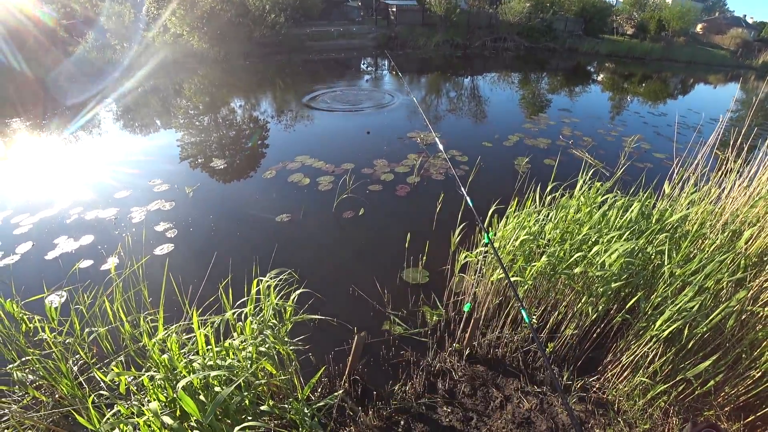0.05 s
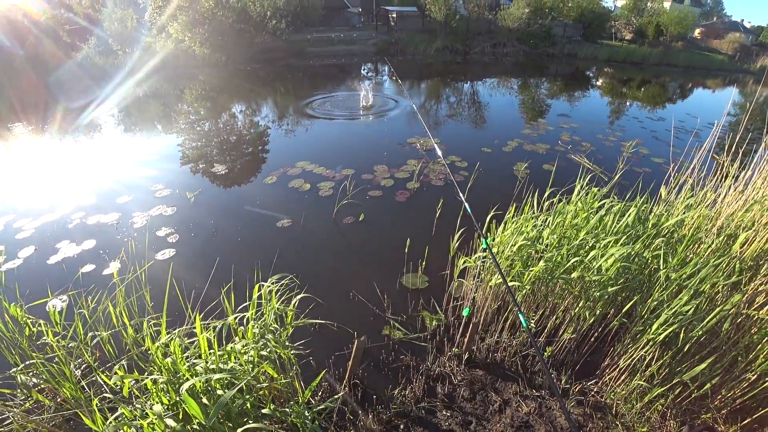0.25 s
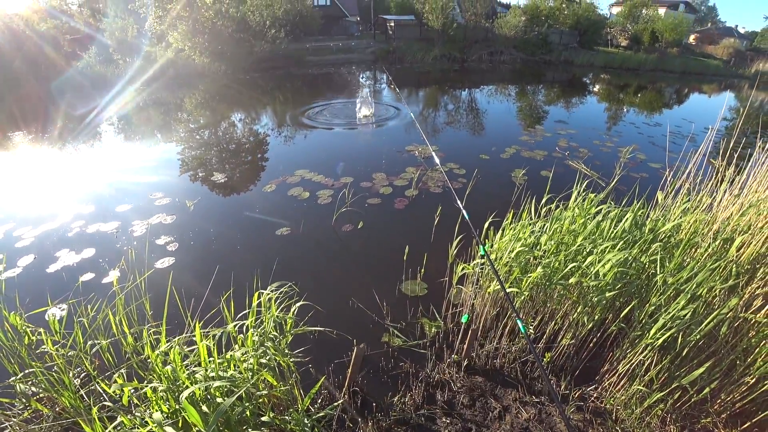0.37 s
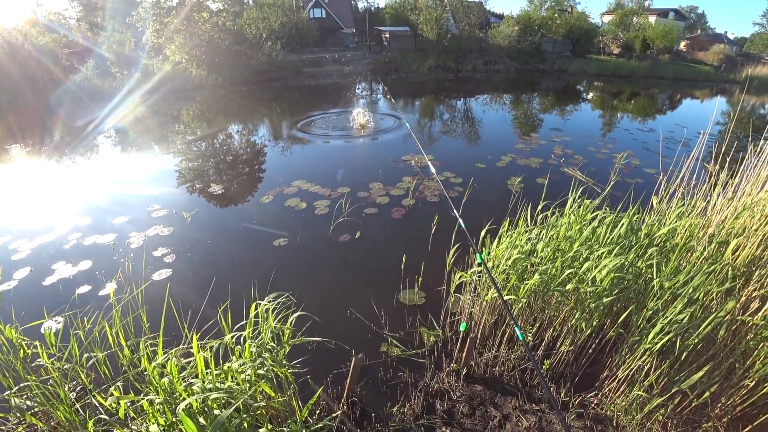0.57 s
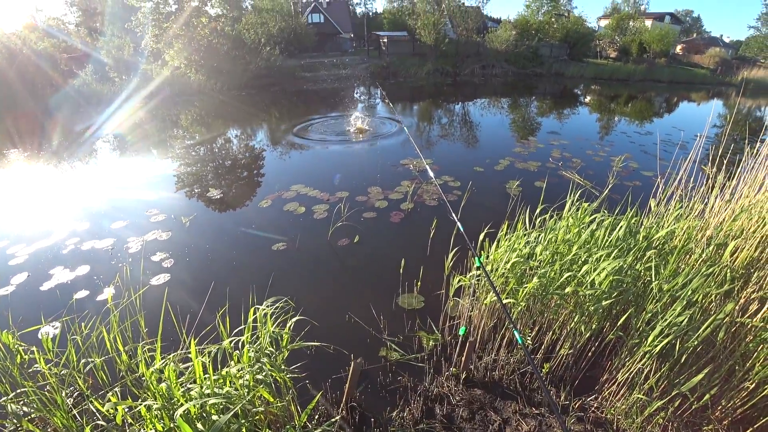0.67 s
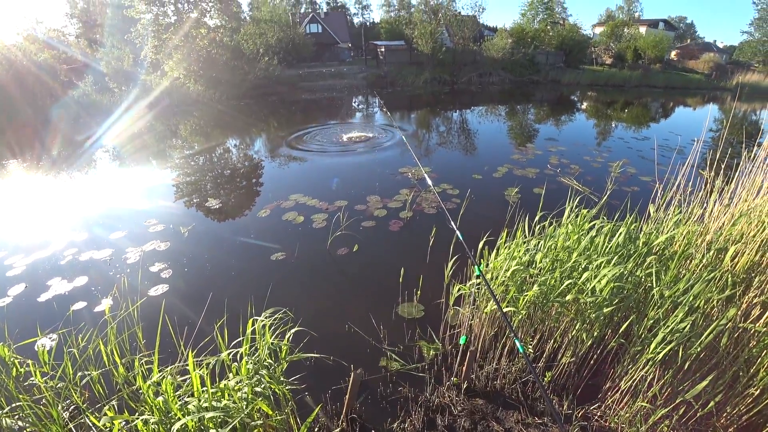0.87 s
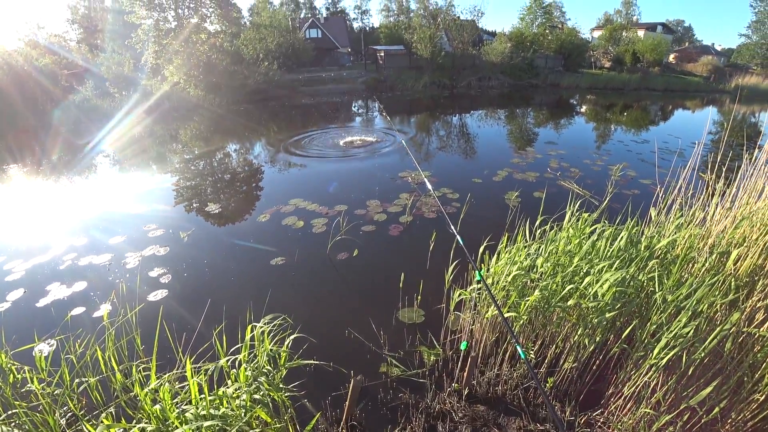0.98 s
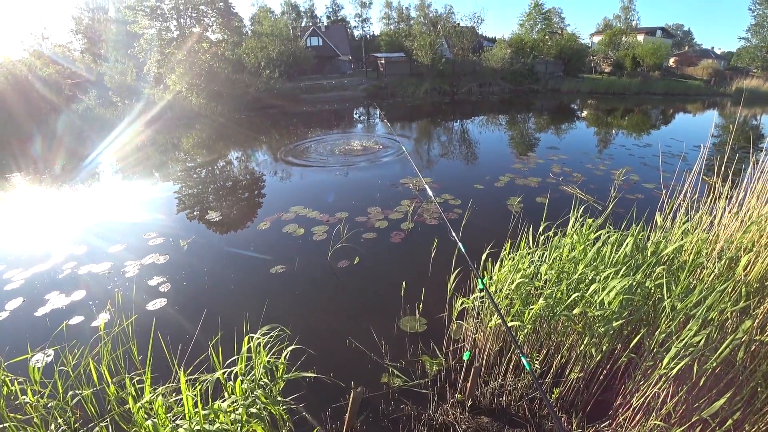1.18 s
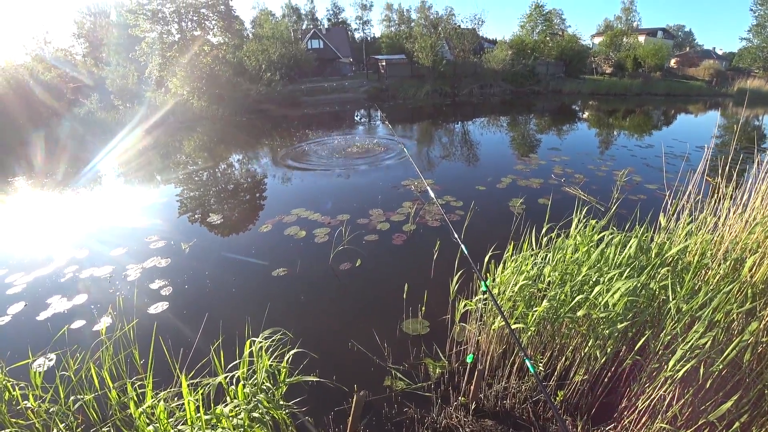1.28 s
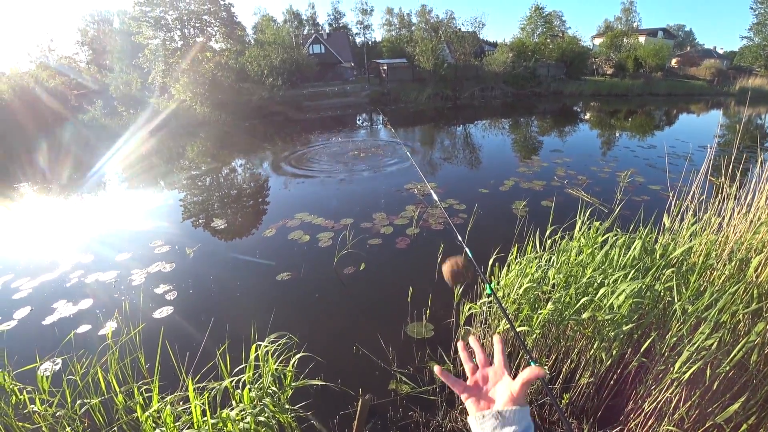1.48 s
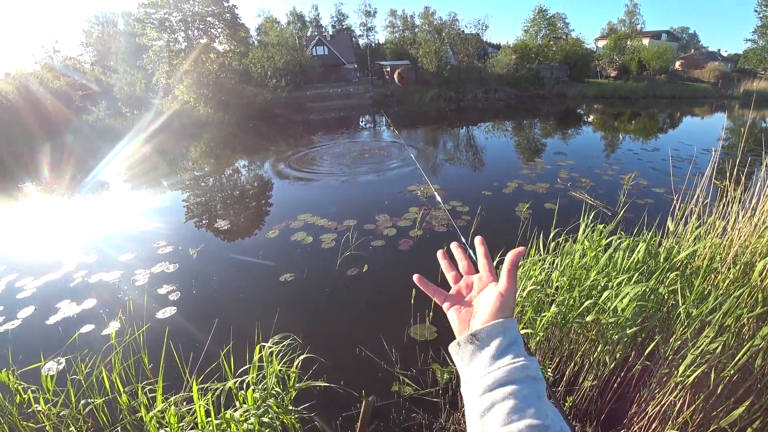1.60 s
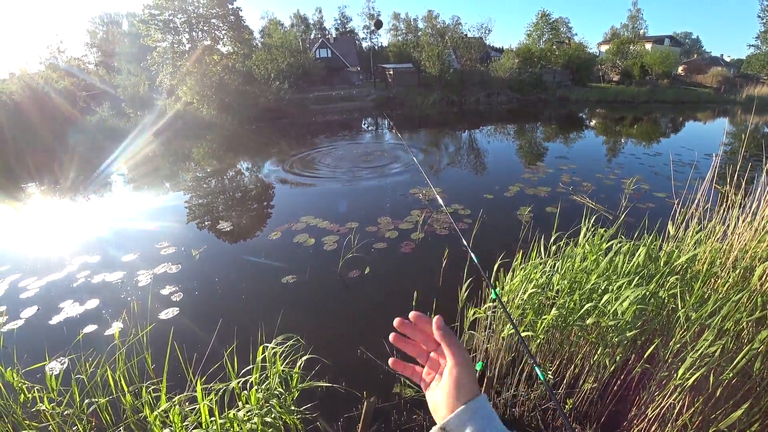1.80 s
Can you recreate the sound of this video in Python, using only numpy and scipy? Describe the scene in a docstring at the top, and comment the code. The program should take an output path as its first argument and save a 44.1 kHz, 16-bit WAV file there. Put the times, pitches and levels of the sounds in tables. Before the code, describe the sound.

A lump splashes into a pond, followed by bubbling gurgles and a few drips.

```python
"""Groundbait splash in a pond

A ball of groundbait slaps into the water some metres from a reedy bank. Its air cavity collapses in a
burst of bubbles, spray rains back, and the jet falls in with gurgles and last drips. Each bubble rings
as a damped, gliding sine. A small bird chirps faintly over a quiet outdoor hush."""
import sys
import numpy as np
from scipy import signal
from scipy.fft import rfft, irfft, next_fast_len
from scipy.io import wavfile
from scipy.ndimage import uniform_filter1d

SR = 44100
rng = np.random.default_rng(int(sys.argv[2]) if len(sys.argv) > 2 else 0)


def to_wav(s):
    """Save 16-bit WAV."""
    ch = np.atleast_2d(s).T  # columns
    pcm = np.round(np.clip(ch, -1, 1) * 32767)  # PCM
    wavfile.write(sys.argv[1], SR, pcm.astype(np.int16))


N = 81585
TIME = np.arange(N) / SR


def amp(db):
    """dB to gain."""
    return 10 ** (np.asarray(db) / 20)


def unit_rms(x):
    """Scale to rms 1."""
    return x / np.sqrt(np.mean(x ** 2) + 1e-20)


def log_interp(points, hz):
    """Interpolate a table over log frequency."""
    f, value = np.transpose(points)
    return np.interp(np.log(hz + 1), np.log(f + 1), value)


def add(mix, start_s, sound):
    """Mix in a sound at start_s."""
    part = mix[max(round(start_s * SR), 0):][:len(sound)]
    part += sound[:len(part)]


def eq(x, points):
    """Zero-phase filter; points: f/Hz, gain/dB."""
    size = next_fast_len(x.shape[-1] + 4096)
    gain = amp(log_interp(points, np.fft.rfftfreq(size, 1 / SR)))
    return irfft(rfft(x, size) * gain, size)[..., :x.shape[-1]]


def causal_eq(x, points, size=2048):
    """Minimum-phase filter of energy 1; keeps attacks sharp."""
    log_gain = np.log(amp(log_interp(points, abs(np.fft.fftfreq(size, 1 / SR)))))
    taps = np.fft.ifft(np.exp(np.conj(signal.hilbert(log_gain)))).real
    return signal.fftconvolve(x, taps / np.linalg.norm(taps))[:len(x)]


def flutter(samples):
    """Smooth random wavering, rms 1."""
    return unit_rms(uniform_filter1d(uniform_filter1d(rng.standard_normal(N), samples), samples))


def reflections(decay_s):
    """Impulse response of a dying cloud of reflections, energy 1."""
    cloud = rng.standard_normal(SR) * np.exp(-TIME[:SR] / decay_s)
    return cloud / np.linalg.norm(cloud)


def bubble(hz, decay_s, octaves_per_s, attack_cycles):
    """Damped ring that swells, then decays, gliding as the bubble nears the surface."""
    attack_s = attack_cycles / hz
    t = np.arange(0, 7 * decay_s + attack_s, 1 / SR)
    pitch_hz = np.minimum(hz * 2 ** (octaves_per_s * t), SR / 2)
    swell = np.sin(np.pi / 2 * np.minimum(t / attack_s, 1)) ** 2
    fade = np.exp(-np.maximum(t - attack_s, 0) / decay_s)
    return swell * fade * np.sin(2 * np.pi * np.cumsum(pitch_hz) / SR)


def swarm(colour, per_s, cycles, glide_oct, spread_db, pitches=48):
    """Random small bubbles, rms 1; cycles: nominal decay, glide_oct: largest rise per decay time."""
    out = np.zeros(N)
    for hz in np.geomspace(max(colour[0][0], 200), colour[-1][0], pitches):
        decay_s = cycles * rng.uniform(0.69, 1.89) / hz
        ring = bubble(hz, decay_s, glide_oct * rng.random() / decay_s, attack_cycles=1)
        onsets = rng.random(N) < per_s / pitches / SR
        strength = amp(spread_db * np.minimum(rng.exponential(1, N), 3.5))
        hits = onsets * strength * rng.choice([-1, 1], N)
        out += unit_rms(signal.oaconvolve(hits, ring)[:N]) * np.sqrt(hz)  # equal power per Hz
    return unit_rms(eq(out, colour))


def hush(level_db=-59):
    """Steady distant outdoor noise, partly shared by both ears."""
    colour = [(25, -65), (60, -17), (130, -20.5), (255, -3.5), (480, -1), (820, 3), (1300, -3),
              (2400, -5.5), (4500, -7.5), (6100, -12), (8000, -18.5), (10500, -15.5), (15800, -19)]  # noise spectrum: f/Hz, gain/dB
    coherence = [(60, .95), (180, .8), (550, .4), (1650, .15), (5000, .5), (15000, .7)]  # left-right likeness: f/Hz, correlation
    left, independent = rfft(rng.standard_normal((2, N)))
    shared = np.clip(log_interp(coherence, np.fft.rfftfreq(N, 1 / SR)), -1, 1)
    right = shared * left + np.sqrt(1 - shared ** 2) * independent
    return amp(level_db) * unit_rms(eq(irfft([left, right], N), colour))


def bank(x):
    """Stereo placement slightly left, with reed scatter and a faint far-shore echo."""
    scatter_colour = [(100, -28), (500, -29.5), (1200, -8), (2500, -14.5), (5000, -17), (14000, -24)]  # reed scatter: f/Hz, gain/dB
    echo_colour = [(100, 0), (600, 3), (3000, 4), (8000, -13.5), (15000, -14)]  # far shore: f/Hz, relative gain/dB
    left_lead = [(100, 0), (600, -.6), (1300, -.6), (4000, -.12), (12000, 0)]  # left minus right: f/Hz, phase/rad
    left_excess = [(100, -0.5), (550, 0), (1650, 1.8), (5000, 1.5), (10000, 3)]  # left minus right: f/Hz, level/dB
    scatter = eq(signal.fftconvolve(x, reflections(decay_s=0.0072))[:N], scatter_colour)
    lead_rad = log_interp(left_lead, np.fft.rfftfreq(N, 1 / SR))
    ears = []
    for sign in (1, -1):
        direct = irfft(rfft(x) * np.exp(1j * sign * lead_rad / 2), N)
        echo = amp(-15.5) * eq(signal.fftconvolve(x, reflections(decay_s=0.077))[:N], echo_colour)
        balance = [(hz, sign * db / 2) for hz, db in left_excess]
        ears.append(eq(direct + sign * scatter + echo, balance))
    return np.array(ears)


def bird(waver=0.035, rasp=0.4):
    """Thin, slightly raspy whistles, mostly sliding down."""
    notes = [(0.006, 0.036, 3240, -10, -62.5), (0.049, 0.072, 4470, -1.2, -57.5),
             (0.097, 0.066, 4320, 0, -57), (0.145, 0.033, 4100, -2.5, -56.5), (0.33, 0.043, 3410, -1, -65),
             (0.475, 0.033, 4600, 0, -52), (1.832, 0.036, 3740, 12, -57.5)]  # chirps: t/s, length/s, f/Hz, glide/(oct/s), level/dB
    out = np.zeros(N)
    for start_s, length_s, hz, glide, db in notes:
        t = np.arange(0, length_s, 1 / SR)
        pitch_hz = hz * 2 ** (glide * t) * (1 + waver * flutter(samples=18)[:len(t)])
        level = amp(db) * np.sin(np.pi * t / length_s) * (1 + rasp * flutter(samples=90)[:len(t)])
        add(out, start_s, level * np.sin(2 * np.pi * np.cumsum(pitch_hz) / SR))
    return out


def late_droplets(level_db=-64.5, centre_s=1.38, width_s=0.25):
    """Separate droplets and popping foam outlast the splash."""
    colour = [(1300, 3), (2300, 2), (4500, 0), (7000, -14), (10000, -8)]  # droplet spectrum: f/Hz, gain/dB
    level = amp(level_db) * np.exp(-((TIME - centre_s) / width_s) ** 2)
    return level * swarm(colour, per_s=260, cycles=4, glide_oct=0.1, spread_db=3)


def drips(octaves_per_s=670):
    """Tiny bubbles pop at the surface: very short upward chirps with faint reflections."""
    pops = [(0.7408, 4860, -31.5, 0.00045), (0.771, 5150, -35.5, .0004), (0.823, 5460, -34.5, 0.00049),
            (0.8961, 5670, -24, 0.00031), (0.967, 5370, -33, .0005), (1.084, 8800, -41.5, 0.00048),
            (1.103, 4400, -33.5, 0.00053), (1.1715, 8000, -43, .0003), (1.191, 5740, -39, .0005),
            (1.2156, 6470, -31.5, 0.00042), (1.233, 9100, -41, 0.00089), (1.255, 8400, -38.5, .0003),
            (1.3465, 5200, -41.5, 0.00076), (1.368, 4550, -44.5, .0007), (1.4444, 8500, -31.5, 0.00069),
            (1.511, 3460, -49, 0.00066), (1.631, 13000, -43.5, 0.00064), (1.686, 4440, -50, .0005)]  # chirps: centre t/s, f/Hz, peak/dB, half length/s
    out = np.zeros(N)
    for centre_s, hz, db, half_s in pops:
        t = np.arange(-3 * half_s, 3 * half_s, 1 / SR)
        pitch_hz = np.minimum(hz * 2 ** (octaves_per_s * t), SR / 2)
        level = amp(db) * np.exp(-(t / half_s) ** 2)
        add(out, centre_s + t[0], level * np.sin(2 * np.pi * np.cumsum(pitch_hz) / SR))
    return out + 0.2 * signal.fftconvolve(out, reflections(decay_s=0.0036))[:N]


def plops():
    """Single large bubbles ring out above the splash."""
    bubbles = [(0.294, 2310, -41, 0.0037, 1), (0.3965, 2210, -29.5, 0.0025, 9),
               (0.397, 251.5, -54, 0.012, -4.5), (0.403, 1000, -42, 0.0053, -1),
               (0.414, 650.3, -39, 0.026, -0.5), (0.4595, 634, -36.5, 0.0054, 0.5),
               (0.46, 362, -50.5, 0.012, 14.5), (0.506, 880, -47, 0.015, -3),
               (0.508, 1800, -42.5, .006, -9), (0.524, 771, -43, 0.017, 11),
               (0.555, 1630, -40.5, 0.0037, 2), (0.592, 646, -46, 0.015, 14),
               (0.604, 382, -48.5, 0.0084, 1), (0.652, 1058, -45, 0.0088, 1), (0.816, 747, -40, 0.0027, 4),
               (0.841, 1067, -36.5, 0.0034, 15), (0.844, 392, -49, 0.0058, 20), (0.911, 677, -48, 0.013, 3),
               (0.94, 1506, -34.5, 0.0056, -2), (0.956, 2240, -31, 0.0021, -7),
               (0.9886, 1602, -26.5, 0.0032, 6.5), (1.0125, 1716, -32.5, 0.0021, 6),
               (1.022, 788, -42, 0.021, 19), (1.071, 950, -37.5, 0.0017, 11),
               (1.110, 565, -46, 0.022, 17.5), (1.123, 760, -42, .009, 24.5),
               (1.168, 2140, -43.5, 0.0028, 1), (1.202, 2460, -36.5, 0.0023, 5),
               (1.297, 1650, -53, .006, 2), (1.367, 2350, -50.5, 0.0043, 12), (1.407, 933, -53, 0.0052, 16),
               (1.493, 1580, -50.5, 0.0041, 6)]  # rings: t/s, f/Hz, peak/dB, decay/s, glide/(oct/s)
    out = np.zeros(N)
    for start_s, hz, db, decay_s, glide in bubbles:
        add(out, start_s, amp(db) * bubble(hz, decay_s, glide, attack_cycles=2.25))
    return out


def falling_water(rise_s=0.052, fade_s=0.21, clump_db=0.5):
    """Spray, then the jet, fall back in clumps: large bubbles gurgle, drops patter, droplets fizz."""
    envelopes = [(0.43, -48, -43, -52), (0.444, -63, -55, -46.5), (0.466, -51, -52, -48),
                 (0.48, -55.5, -52, -51), (0.526, -49.5, -49, -55.5), (0.552, -54, -48, -46.5),
                 (0.644, -49, -45.5, -48.5), (0.718, -55.5, -47, -48.5), (0.888, -52.5, -47.5, -52),
                 (0.894, -54, -48, -47), (0.91, -47, -46.5, -50), (0.96, -48, -41.5, -43),
                 (1.134, -55.5, -50, -54), (1.198, -58, -52.5, -53.5), (1.31, -83, -68, -61),
                 (1.49, -73, -74, -59.5), (1.56, -92, -76, -63.5)]  # relative layer levels: t/s, gurgle/dB, patter/dB, fizz/dB
    # layer spectra: f/Hz, gain/dB
    gurgle_colour = [(100, -47), (200, -20.5), (350, -4), (520, -0.5), (680, 5.5), (1080, 5.5), (1260, -6),
                     (1600, -4)]
    patter_colour = [(900, -30), (1280, -18.5), (1500, -4), (1680, -3), (2060, -6.5), (2380, -0.5),
                     (2820, -10), (3300, -5.5), (3900, -9), (5000, -16)]
    fizz_colour = [(3000, -1), (4100, -5.5), (5400, 1.5), (6300, -4.5), (7300, -0.5), (8600, -8.5),
                   (10500, -7), (12500, -13.5), (15500, -18)]
    times_s, *levels_db = np.transpose(envelopes)
    gate = np.exp(np.minimum(TIME - times_s[0], 0) / rise_s - np.maximum(TIME - times_s[-1], 0) / fade_s)
    gurgle = amp(-1.0) * swarm(gurgle_colour, per_s=1500, cycles=6.3, glide_oct=0.116, spread_db=1.5)
    patter = amp(-1.5) * swarm(patter_colour, per_s=1500, cycles=5.4, glide_oct=0.072, spread_db=2.5)
    fizz = amp(-0.9) * swarm(fizz_colour, per_s=3200, cycles=2.1, glide_oct=0.07, spread_db=2.0)
    clumps = amp(clump_db * flutter(samples=400))
    gains = [amp(np.interp(TIME, times_s, db)) for db in levels_db]
    return gate * clumps * sum(gain * layer for gain, layer in zip(gains, (gurgle, patter, fizz)))


def cavity_collapse():
    """The air cavity shuts and tears into a dense burst of bubbles."""
    bursts = [(0.373, -43.5, 0.0076, 0.0076, 0.0075), (0.394, -35, 0.0054, 0.015, 0.0089)]  # collapse stages: t/s, level/dB, attack/s, hold/s, decay/s
    colour = [(100, -32), (230, -4.5), (420, -24), (680, 1), (1020, -2.5), (1330, -18), (1550, -3.5),
              (2300, -4), (2800, -5.5), (3800, -0.5), (5400, 0.5), (7300, -8.5), (8600, -10.5),
              (10500, -11.5), (15500, -23)]  # burst spectrum: f/Hz, gain/dB
    level = np.zeros(N)
    for start_s, db, attack_s, hold_s, decay_s in bursts:
        t = TIME - start_s
        fade = np.exp(-np.maximum(t - attack_s - hold_s, 0) / decay_s)
        level += amp(db) * np.clip(t / attack_s, 0, 1) * fade
    return level * swarm(colour, per_s=17000, cycles=9.5, glide_oct=0.04, spread_db=2.5)


def slap(tail_s=0.0094, crown_s=0.076):
    """A crack, its reflection 3 ms later, and the hiss of the rising crown of spray."""
    arrivals = [(0.2393, -28, .0009), (0.2422, -31, .0013)]  # crack and reflection before the filter: t/s, level/dB, decay/s
    colour = [(60, -36), (160, -10), (420, -3.5), (800, 2), (1250, -2.5), (2300, 2.5), (3500, -2),
              (5200, 5.5), (8500, -6.5), (10500, -6), (15500, -22)]  # impact and spray spectrum: f/Hz, gain/dB
    impact = np.zeros(N)
    for start_s, db, decay_s in arrivals:
        add(impact, start_s, amp(db) * rng.standard_normal(N) * np.exp(-TIME / decay_s))
    contact_s = arrivals[0][0]
    add(impact, contact_s, -amp(-13.5) * np.ones(1))  # one-sample spike
    add(impact, contact_s, amp(-40) * rng.standard_normal(N) * np.exp(-TIME / tail_s))
    out = causal_eq(impact, colour)
    crown = swarm(colour, per_s=13000, cycles=3.9, glide_oct=0.11, spread_db=-1)
    add(out, contact_s, amp(-48) * np.exp(-TIME / crown_s) * crown)
    return out


def scene():
    """Splash and bird heard from the bank, over the hush."""
    splash = slap() + cavity_collapse() + falling_water() + plops() + drips() + late_droplets()
    return bank(splash + bird()) + hush()


def record(dry):
    """Steep low-pass on both channels."""
    cutoff_hz = 16050
    taps = signal.firwin(511, cutoff_hz, window=("kaiser", 9), fs=SR)
    return signal.oaconvolve(dry, taps[None], "same")


dry = scene()
out = record(dry)
to_wav(out)
```